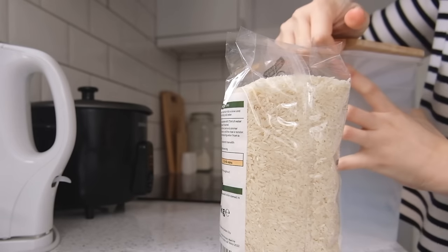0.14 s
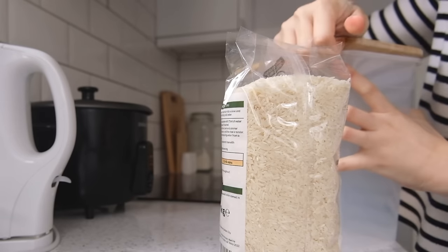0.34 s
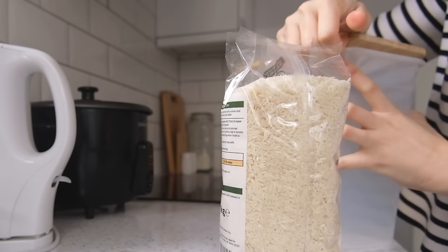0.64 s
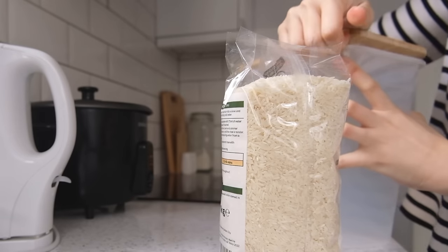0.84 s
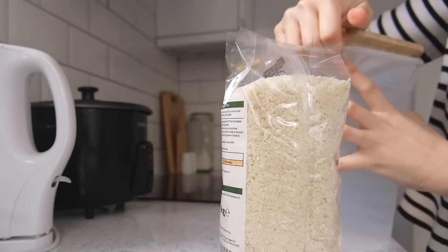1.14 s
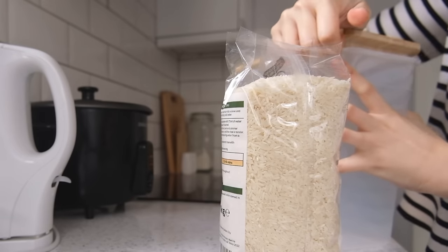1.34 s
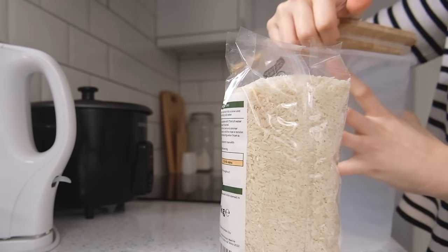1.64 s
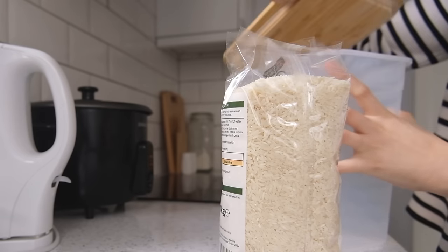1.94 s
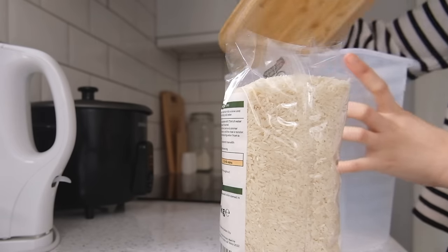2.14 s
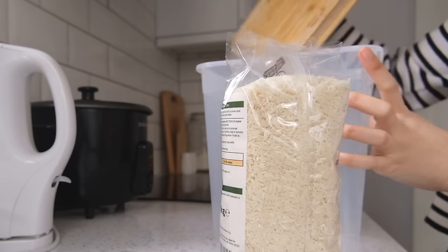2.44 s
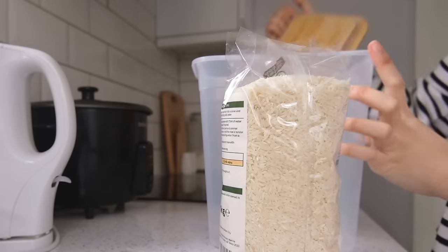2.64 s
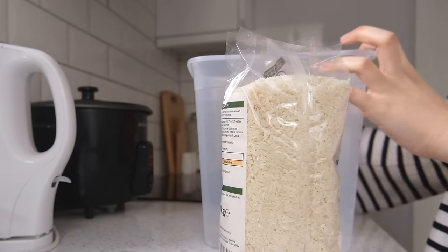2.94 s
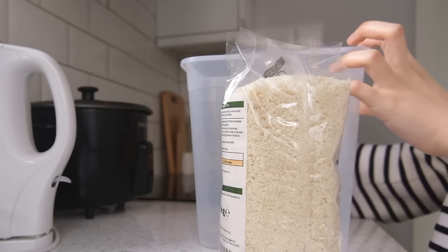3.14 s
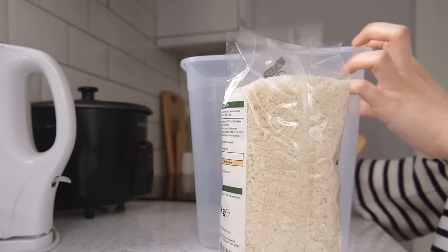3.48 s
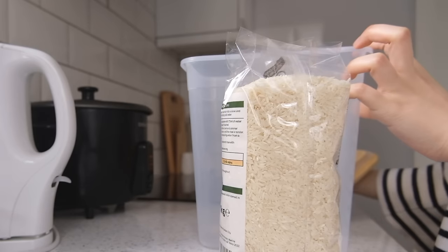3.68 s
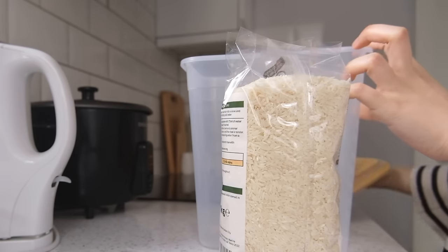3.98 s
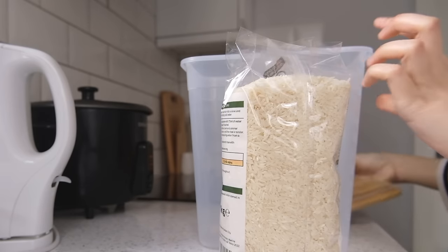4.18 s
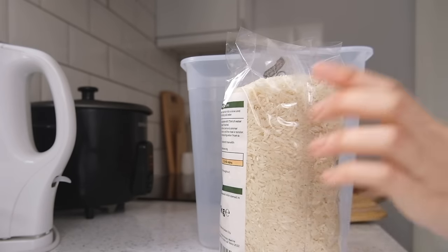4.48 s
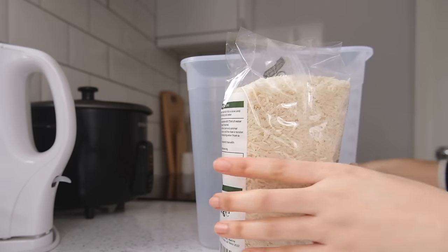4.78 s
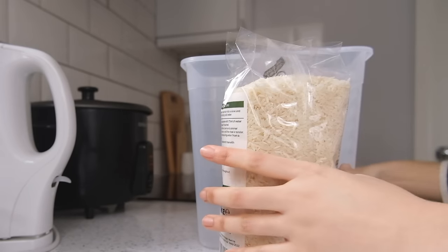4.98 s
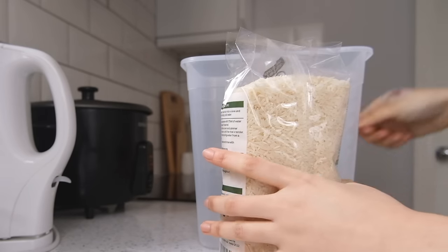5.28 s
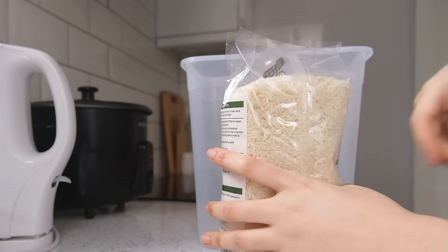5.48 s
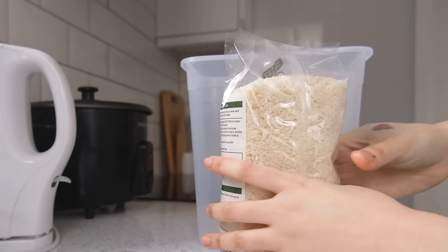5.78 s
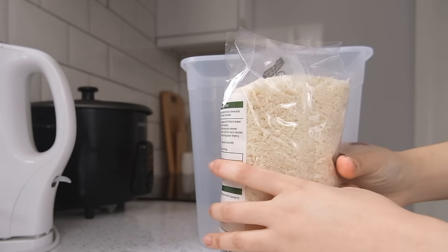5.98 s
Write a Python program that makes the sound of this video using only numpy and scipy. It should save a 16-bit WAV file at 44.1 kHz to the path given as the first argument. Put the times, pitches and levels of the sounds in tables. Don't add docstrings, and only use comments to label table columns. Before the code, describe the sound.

In a quiet home kitchen, a rubber-sealed lid is pulled from a plastic tub with two breathy, whistling hisses, then lets go in a cluster of hollow knocks. The tub shifts briefly. The wooden lid strikes the counter loudly on its edge, scrapes along softly and slaps down flat. Skin and cloth rustle faintly, a bag ticks, and a fridge hums. Close stereo pickup, short room echo.

```python
import sys
import numpy as np
from scipy import signal
from scipy.fft import rfft, irfft
from scipy.io import wavfile
from scipy.ndimage import uniform_filter1d

SR = 44100
rng = np.random.default_rng(int(sys.argv[2]) if len(sys.argv) > 2 else 0)


def transcribe(signal):
    frames = np.atleast_2d(signal).T
    limited = np.clip(frames, -1, 1)
    pcm = np.round(limited * 32767).astype(np.int16)
    wavfile.write(sys.argv[1], SR, pcm)


def rack_gain(trim_db):
    fader = np.asarray(trim_db, float)
    return 10 ** (fader / 20)


N = 269892

# start_s, peak_db, chatter_s (contact time), hardness_hz, boom_db (extra for the low tones)
TUB_KNOCKS = [(.36, -43, 0.026, 1100, 1.5), (.64, -43, 0.078, 288, 5), (.726, -38.5, 0.0038, 1520, 3),
              (1.411, -23, 0.041, 526, 5), (1.449, -18.5, 0.0094, 610, 4), (1.4555, -15, 0.0026, 2550, 1.5),
              (1.517, -23.5, 0.0062, 700, 1), (1.712, -30, 0.0076, 2510, -19),
              (1.7225, -13.5, 0.017, 1000, -4.5), (1.85, -32.5, .014, 650, -21),
              (1.921, -27.5, 0.0022, 756, 0), (1.9995, -11.5, .013, 1670, 2), (2.14, -36.5, 0.03, 900, -19),
              (2.806, -42.5, 0.05, 500, 6), (5.576, -26.5, 0.0029, 934, 0)]
EDGE_KNOCKS = [
    (3.2885, -3.5, .015, 1820, -1.5),
    (3.339, -15, 0.0077, 1090, -4.5),
    (3.431, -30, 0.017, 750, -20),
]
LID_KNOCKS = [
    (4.04, -40.5, 0.076, 900, -9),
    (4.219, -29, 0.059, 1450, 6),
    (4.243, -36, 0.0078, 597, 2),
    (4.266, -37.5, 0.024, 450, 26),
    (4.34, -41, 0.0092, 1500, -23),
    (4.854, -9.5, 0.046, 2630, 4),
    (4.894, -2.5, 0.011, 2360, -39),
    (4.912, -49, 0.058, 695, -1),
]
# pitch_hz, level_db, t60_s (time to fall 60 dB)
TUB_TONES = [(170, -5.5, 0.34), (207.4, -4.5, 0.14), (325, -12.5, 0.18), (341.2, -3.5, 0.16),
             (395, -0.5, 0.058), (470, -3.5, 0.05), (586, -17, 0.041), (700, -4.5, 0.01), (873, -14, 0.13)]
EDGE_TONES = [(77, 2, 0.57), (133, -13, 0.28), (162, -7, 0.27), (203, -5, 0.084), (331.3, -21.5, 0.33),
              (453, -36, .04), (580, 6, 0.017), (745, 0.5, 0.017), (920, -8.5, 0.07)]
LID_TONES = [(178.6, -16, 0.17), (208, -8.5, 0.08), (297.5, -3, 0.15), (358, -6, 0.18), (500, 5.5, 0.028),
             (595, 5.5, 0.02), (742, -21, 0.032), (773, 7, 0.024), (910, 3.5, 0.021)]
SLIDE_TONES = [(450, 10, 0.0057), (810, -7.5, 0.17), (900, 5, 0.032), (1585, -1.5, 0.056),
               (1846, 1.5, 0.037)]
# pitch_hz, level_db
TUB_TOP = [(1100, -65), (1440, -71), (1800, -1), (2200, 2), (2600, -50), (3200, -57), (3900, -54),
           (4700, -39), (5800, -34)]
EDGE_TOP = [(1170, 3), (1590, -5.5), (1790, 0), (2200, -6.5), (2700, -9), (3400, -14), (4100, -45)]
LID_TOP = [(1160, 1), (1560, 4.5), (1900, 2.5), (2350, -25), (2900, 1.5), (3400, -38), (4200, -5),
           (5000, -60)]
# lowest_hz, highest_hz
CRACK_HZ = [1200, 4500]
# start_s, peak_db, first_pitch_hz, second_pitch_hz, t60_s
TICKS = [(0.1392, -31, 2900, 3330, 0.0078), (1.428, -31, 4000, 2570, 0.04), (1.919, -37, 4500, 1190, 0.013),
         (1.978, -29.5, 3650, 4500, 0.0026), (2.923, -45, 3330, 3830, 0.11), (5.286, -55, 3330, 3150, 0.16),
         (5.335, -58, 3900, 3640, 0.24), (5.9295, -35, 2440, 5030, 0.0097)]
# time_s, level_db, fizz_db (thin top, over the hiss)
SEAL = [
    (.02, -93, -14),
    (.07, -60, -21),
    (.22, -49, -28),
    (0.541, -53.5, -9),
    (.6, -56, -7),
    (.878, -58.5, -4),
    (.99, -48, -8),
    (1.36, -56, -4),
    (1.41, -57.5, -19),
]
# pitch_hz, level_db (per Hz)
SEAL_COLOUR = [(760, -31), (1300, -27), (1470, -17), (1760, -2.5), (2840, 1), (3050, 1.5), (3350, -1),
               (4870, 1), (5990, -2.5), (9180, -6), (15600, -30)]
# time_s, pitch_hz, width_hz, level_db (over the hiss)
WHISTLE = [(.04, 4500, 700, 10), (.12, 6150, 1200, 10), (.25, 6600, 2230, 2), (.45, 6240, 1500, -1),
           (0.601, 4860, 900, -7), (.9, 5030, 900, -4), (.98, 4760, 1200, 3.5), (1.4, 4960, 1100, 0)]
# peak_time_s, level_db, rise_s, release_s
DRAG = [
    (2.05, -27, .004, 0.028),
    (2.14, -44, 0.34, 0.27),
    (2.298, -41.5, .2, 0.28),
    (2.476, -44.5, 0.11, 0.24),
    (2.936, -50.5, 0.046, 0.06),
]
# time_s, level_db
SLIDE = [
    (3.85, -68),
    (4.02, -69),
    (4.24, -53),
    (4.448, -56),
    (4.652, -55),
    (4.84, -74),
]
# peak_time_s, level_db, rise_s, release_s, brightness_db (per octave)
RUB = [(1.457, -38, .045, 0.084, -2.5), (1.748, -47.5, .004, 0.13, -0.7), (2.06, -56, .004, 0.49, -1),
       (2.232, -58.5, .03, .3, -3.5), (2.385, -58, 0.16, .15, 3), (2.45, -64, .15, 0.48, -9),
       (3.496, -59, 0.027, 0.17, -2.2), (3.686, -69, .1, 0.088, -4), (4.064, -52.5, 0.25, 0.28, 1.4),
       (4.482, -55.5, .33, 0.47, -2), (5.344, -67, .06, 0.092, -3), (5.69, -68, 0.14, 0.096, 6),
       (5.82, -62, 0.044, 0.25, 3), (5.955, -62, .01, 0.027, 6), (6.11, -66, 0.12, .1, -3)]
# pitch_hz, level_db (per Hz)
RUB_COLOUR = [(500, -25), (900, -0.5), (1600, 2.5), (2500, 3), (3800, 4), (5000, 1), (7000, -3.5),
              (10000, -8.5), (12000, -18), (15600, -16)]
# pitch_hz, level_db (per Hz)
AIR = [(13, -34), (22, 0), (59, -9), (97, -6.5), (247, -12.5), (291, -11.5), (352, -14.5), (504, -15.5),
       (663, -18), (1150, -17.5), (1730, -27.5), (3440, -26.5), (3950, -28), (10100, -37), (15600, -45.5)]
# pitch_hz, width_hz, level_db
FAN = [(200.4, 19, -66.5), (289.5, 16.5, -67.5), (1060, 78, -67.5), (1225, 136, -67.5), (2925, 400, -74),
       (3480, 170, -75)]
# first_hz, second_hz, null_s (when they cancel)
HUM = [(49.42, 35.2, 2.748), (98.85, 99.92, 4.04)]
# first_db, second_db
HUM_DB = [(-57, -73), (-63, -60)]
# pitch_hz, likeness (0 to 1)
SAME = [(60, 0.92), (180, 0.94), (550, 0.75), (1650, 0.6), (4970, 0.13), (15000, 0.069)]
# pitch_hz, t60_s
KITCHEN = [(60, 0.67), (170, 0.49), (500, 0.32), (1400, 0.34), (2700, 0.3), (5000, 0.22), (11000, 0.12)]

BOOM_BELOW_HZ, DAMPED_T60_S = 300, 0.012
TUB_CRACK_DB, EDGE_CRACK_DB, LID_CRACK_DB = -15, -28.5, -30
HARD_HZ, SOFT_DB_PER_OCTAVE = 1000, 31
STROKE_SPAN_DB = 20
ROOM_DB, AIR_DB = -8.5, -54.5


def evened(x):
    return x / np.sqrt(np.mean(x ** 2) + 1e-20)


def read(points, hz):
    f, value = np.transpose(points)
    return np.interp(np.log(hz + 1), np.log(f + 1), value)


def add(mix, start_s, sound):
    part = mix[round(start_s * SR):][:len(sound)]
    part += sound[:len(part)]


def level(rows):
    s, db = np.transpose(rows)[:2]
    return rack_gain(np.interp(np.arange(N) / SR, s, db, -120, -120))


def strokes(rows, t):
    s, db, rise, release = np.transpose(rows)[:4, :, None]
    away = np.maximum((s - t) / rise, (t - s) / release)
    return rack_gain(db - STROKE_SPAN_DB * away)


def stroke_level(rows):
    t = np.arange(0, N / SR, .001)
    total = np.sqrt((strokes(rows, t) ** 2).sum(0))
    return np.interp(np.arange(N) / SR, t, total)


def fuzzy_peak(hz, centre_hz, width_hz, db):
    half = width_hz / 2
    return rack_gain(2 * db) / (np.pi * half) / (1 + ((hz - centre_hz) / half) ** 2) ** 2


def noise(colour_db, patchy_db, flicker_db, same_share, size=512):
    hop = size // 4
    frames, hz = N // hop + 5, np.fft.rfftfreq(size, 1 / SR)[:, None]
    a, b, c, d, patches = rng.standard_normal((frames, len(hz), 5)).T
    patches = uniform_filter1d(patches, size=6, axis=0)
    patches = evened(uniform_filter1d(patches, size=16, axis=1))
    flicker = evened(uniform_filter1d(rng.standard_normal(frames), size=3))
    same = np.clip(same_share * read(SAME, hz), -1, 1)
    left = a + 1j * b
    right = same * left + np.sqrt(1 - same ** 2) * (c + 1j * d)
    gain_db = colour_db(hz, np.arange(frames) * hop / SR) + patchy_db * patches + flicker_db * flicker
    slices = np.array([left, right]) * rack_gain(gain_db)
    return signal.istft(slices, nperseg=size, noverlap=size - hop)[1][:, :N]


def rings(tones, seconds=.5):
    hz, db, t60 = np.transpose(tones)[:, :, None]
    t = np.arange(round(seconds * SR)) / SR
    return rack_gain(db - 60 * t / t60) * np.sin(2 * np.pi * hz * t)


def chatter_force(jolts, shape):
    force = jolts * shape
    for _ in range(8):
        spectrum = rfft(force)
        force = irfft(spectrum / (abs(spectrum) + 1e-9)) * shape
    return force


def knock(row, tones, ringing, crack_db):
    start_s, db, chatter_s, hard_hz, boom_db = row
    t = np.arange(4096) / SR
    jolts, fizz = rng.standard_normal((2, len(t)))
    shape = np.sqrt(np.clip(np.sin(np.pi * np.clip(t / chatter_s, 0, 1) ** .4), 0, 1))
    contact = signal.butter(2, [130, np.clip(hard_hz, 250, 9000)], "band", fs=SR)
    force = signal.lfilter(*contact, chatter_force(jolts, shape))
    low = np.transpose(tones)[0] < BOOM_BELOW_HZ
    spot = rng.standard_normal(len(tones))
    body = rack_gain(boom_db * low + 1.5 * spot) @ ringing
    sound = signal.fftconvolve(force, body)
    sound /= abs(sound).max()
    crack = fizz * (.5 * np.exp(-t / .003) + .4 * np.exp(-t / .024) + .5 * shape)
    crack = signal.lfilter(*signal.butter(2, CRACK_HZ, "band", fs=SR), crack)
    crack_db = crack_db - SOFT_DB_PER_OCTAVE * max(np.log2(HARD_HZ / hard_hz), 0)
    sound[:len(t)] += rack_gain(crack_db) * crack
    return start_s, rack_gain(db) * sound


def knocks():
    out = np.zeros(N)
    bodies = ((TUB_KNOCKS, TUB_TONES, TUB_TOP, TUB_CRACK_DB),
              (EDGE_KNOCKS, EDGE_TONES, EDGE_TOP, EDGE_CRACK_DB),
              (LID_KNOCKS, LID_TONES, LID_TOP, LID_CRACK_DB))
    for table, tones, top, crack_db in bodies:
        tones = tones + [(hz, db, DAMPED_T60_S) for hz, db in top]
        ringing = rings(tones, .4)
        for row in table:
            add(out, *knock(row, tones, ringing, crack_db))
    return out


def ticks():
    out = np.zeros(N)
    for start_s, db, first_hz, second_hz, t60 in TICKS:
        pair = rings([(first_hz, db - 6, t60), (second_hz, db - 6, t60)])
        add(out, start_s, pair.sum(0))
    return out


def seal():
    s, _, fizz_db = np.transpose(SEAL)
    gap_s, *whistle = np.transpose(WHISTLE)

    def colour_db(hz, t):
        peak = 7000 * fuzzy_peak(hz, *(np.interp(t, gap_s, column) for column in whistle))
        fizz = 1500 * fuzzy_peak(hz, 13300, 4600, np.interp(t, s, fizz_db))
        power = rack_gain(2 * read(SEAL_COLOUR, hz)) * (1 + peak) + fizz
        return 10 * np.log10(power / power.sum(0))

    hiss = noise(colour_db, patchy_db=1.8, flicker_db=0.15, same_share=1.5)
    return rack_gain(1.17) * level(SEAL) * evened(hiss)


def drag(gain, tones):
    swell_db = 0.84 * evened(uniform_filter1d(rng.standard_normal(N), size=400))
    force = rng.standard_normal(N) * rack_gain(swell_db)
    drummed = signal.oaconvolve(force, rings(tones).sum(0))[:N]
    return rack_gain(-4) * gain * evened(drummed)


def rub():
    def colour_db(hz, t):
        power = strokes(RUB, t) ** 2 + 1e-30
        tilt_db = np.clip(np.transpose(RUB)[4] @ power / power.sum(0), -6, 5)
        db = read(RUB_COLOUR, hz) + tilt_db * np.log2((hz + 50) / 3000)
        return db - 10 * np.log10(rack_gain(2 * db).sum(0))

    rustle = noise(colour_db, patchy_db=.8, flicker_db=1.55, same_share=1.14)
    return rack_gain(1.34) * stroke_level(RUB) * evened(rustle)


def fridge():
    def air_db(hz, s):
        return read(AIR, hz) + 0 * s

    def fan_db(hz, s):
        return 10 * np.log10(sum(fuzzy_peak(hz, *band) for band in FAN)) + 0 * s

    air = noise(air_db, patchy_db=2.5, flicker_db=-0.46, same_share=0.98, size=2048)
    fan = noise(fan_db, patchy_db=1.5, flicker_db=1.5, same_share=1., size=2048)
    t = np.arange(N) / SR
    hum = np.zeros(N)
    for (a_hz, b_hz, null_s), (a_db, b_db) in zip(HUM, HUM_DB):
        hum += rack_gain(a_db + 3) * np.sin(2 * np.pi * a_hz * (t - null_s))
        hum -= rack_gain(b_db + 3) * np.sin(2 * np.pi * b_hz * (t - null_s))
    return rack_gain(AIR_DB - 1.5) * evened(air) + rack_gain(-59.5) * evened(fan) + hum * rack_gain([[.4], [-.4]])


def glints(x):
    t = np.arange(900) / SR
    echoes = evened(rng.standard_normal(len(t)) * np.exp(-t / .006)) / np.sqrt(len(t))
    side = signal.oaconvolve(x, echoes)[:N]
    side = signal.lfilter(*signal.butter(1, 1800, "high", fs=SR), side)
    return x * rack_gain([[-.8], [.2]]) + rack_gain(-3.0) * side * [[1], [-1]]


def kitchen(x):
    taps = np.zeros((2, SR))
    at = np.arange(120, SR - 20, 20) + rng.integers(0, 20, (2, (SR - 121) // 20))
    np.put_along_axis(taps, at, rng.choice([-1., 1.], at.shape), 1)
    hz, t, z = signal.stft(taps, SR, nperseg=512)
    same = np.clip(1.18 * read(SAME, hz), 0, 1)[:, None]
    z[1] = same * z[0] + np.sqrt(1 - same ** 2) * z[1]
    fade = rack_gain(-60 * t / read(KITCHEN, hz)[:, None])
    tail = signal.istft(z * fade, SR, nperseg=512)[1]
    return signal.fftconvolve(x[None], tail / np.linalg.norm(tail[0]), axes=1)[:, :N]


def scene():
    dragged_tub = drag(stroke_level(DRAG), TUB_TONES[1:])
    sliding_lid = drag(level(SLIDE), SLIDE_TONES)
    bodies = knocks() + ticks() + dragged_tub + sliding_lid
    near = signal.lfilter(*signal.butter(4, 120, "high", fs=SR), bodies)
    echoes = kitchen(signal.lfilter(*signal.butter(1, 330, "high", fs=SR), near))
    return glints(near) + rack_gain(ROOM_DB) * echoes + seal() + rub() + fridge()


def low_pass(x):
    return signal.sosfilt(signal.butter(12, 15750, fs=SR, output="sos"), x)


def record(dry):
    power = uniform_filter1d((dry ** 2).mean(0), size=440, origin=219)
    power_db = 10 * np.log10(abs(power) + 1e-12)
    fall_db = np.arange(N) * 70 / SR
    held_db = np.maximum.accumulate(power_db + fall_db) - fall_db
    over_db = np.maximum(held_db + 33, 0)
    over_db = uniform_filter1d(over_db, size=440, origin=219)
    bass = signal.filtfilt(*signal.butter(2, 3800, fs=SR), dry)
    bass_cut_db = .25 * over_db
    treble_cut_db = bass_cut_db + .25 * np.maximum(over_db - 6, 0)
    ducked = bass / rack_gain(bass_cut_db) + (dry - bass) / rack_gain(treble_cut_db)
    mix = signal.sosfilt(signal.ellip(8, .5, 60, 15650, fs=SR, output="sos"), ducked)
    return low_pass(mix)


dry = scene()
out = record(dry)
transcribe(out)
```